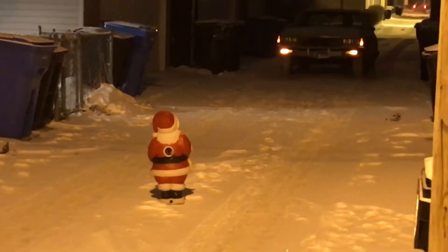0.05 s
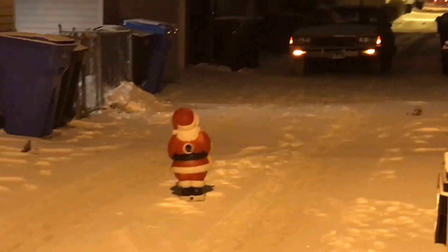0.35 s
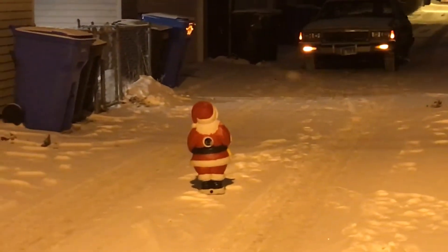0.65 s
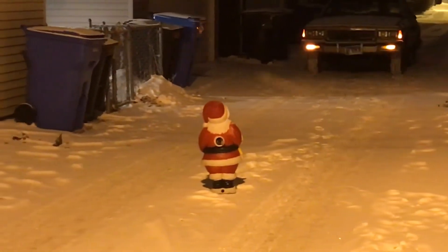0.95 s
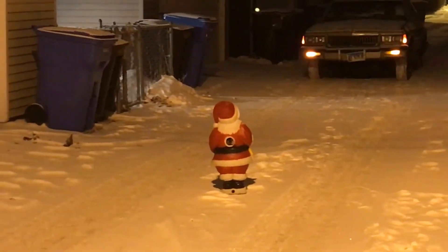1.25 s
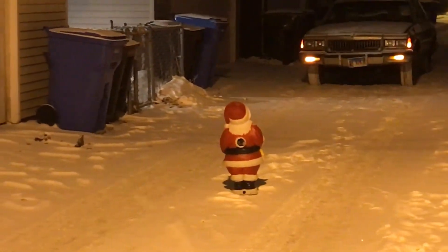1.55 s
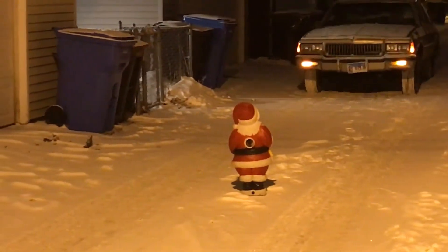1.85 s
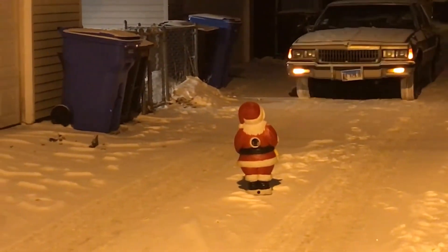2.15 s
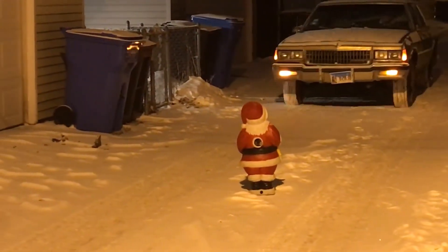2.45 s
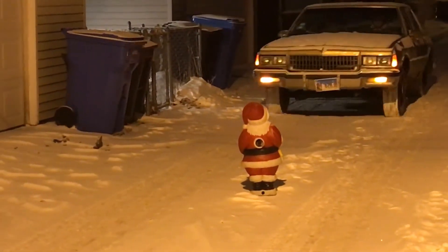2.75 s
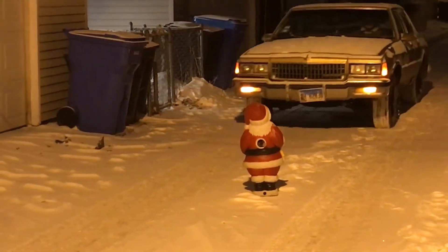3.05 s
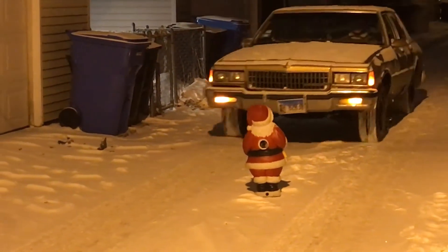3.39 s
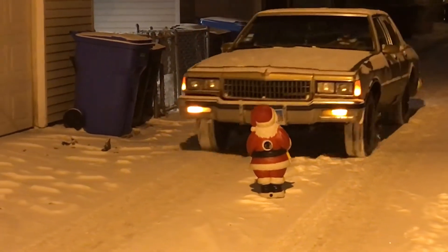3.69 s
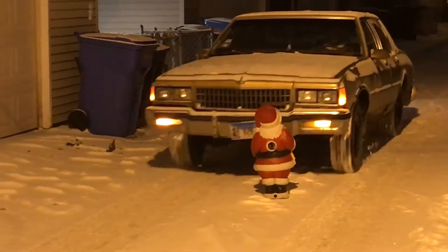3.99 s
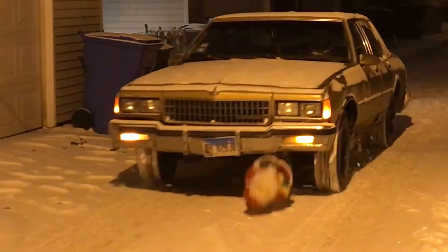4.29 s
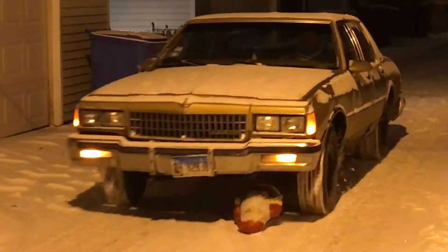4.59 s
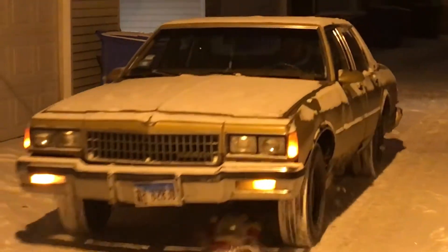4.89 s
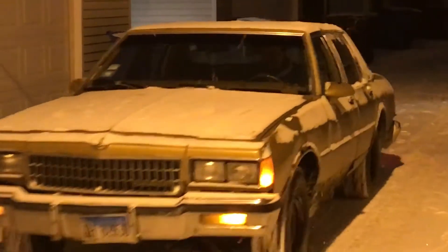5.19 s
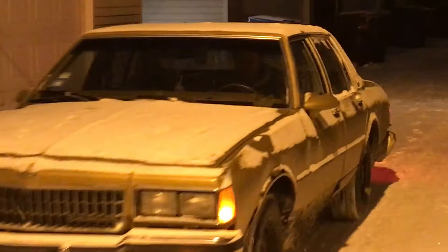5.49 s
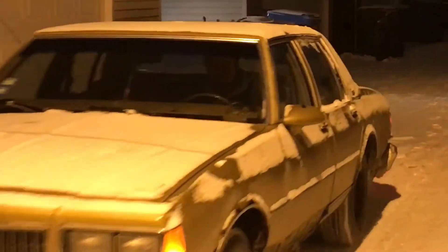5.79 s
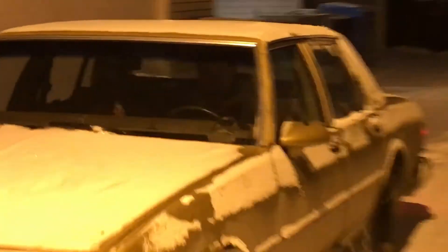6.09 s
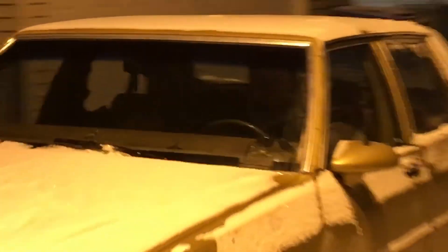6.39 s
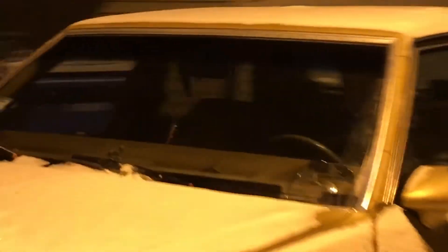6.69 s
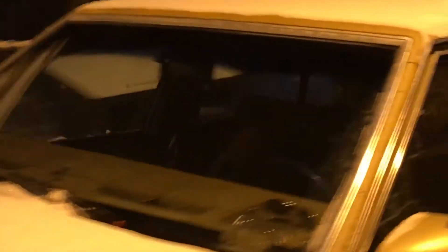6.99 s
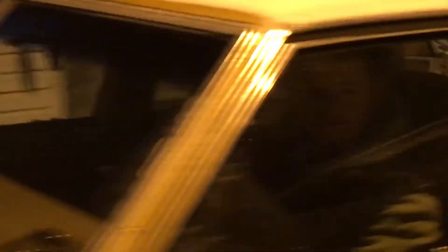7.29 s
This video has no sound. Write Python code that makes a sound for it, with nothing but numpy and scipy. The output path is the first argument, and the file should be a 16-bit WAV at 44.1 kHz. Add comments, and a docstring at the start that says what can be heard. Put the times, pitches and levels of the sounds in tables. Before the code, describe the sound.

A low, uneven engine rumble slowly draws nearer in an alley, with soft creaks of snow under the tyres. Suddenly a hollow plastic figure is run over with sharp cracks, hollow knocks and crunching, much louder than the car. Wedged underneath, it rubs and judders across the snow, cracks again and keeps up a hollow, booming scrape as the car comes close to the microphone.

```python
"""A car crushes a plastic figure

An old V8 sedan creeps up a snowy alley, engine throbbing and tyres crunching, and knocks over a
hollow plastic figure. The shell cracks, squeaks and crumples under the bumper, then is dragged
over packed snow, booming and scraping, as the car passes close by.
Garage walls echo the figure's noises, and a limiter holds down the loudest blows."""
import sys
import numpy as np
from scipy import signal
from scipy.fft import rfft, irfft, next_fast_len
from scipy.io import wavfile
from scipy.ndimage import uniform_filter1d, minimum_filter1d, map_coordinates

SR = 44100
rng = np.random.default_rng(int(sys.argv[2]) if len(sys.argv) > 2 else 0)


def wav_record(signal):
    """Record a signal, one row per channel, as 16-bit PCM in the file named by sys.argv[1]."""
    frames = np.transpose(np.atleast_2d(signal))
    bounded = np.clip(frames, -1, 1)
    # unit amplitude maps onto the largest positive 16-bit level
    quanta = np.round(bounded * 32767).astype(np.int16)
    wavfile.write(sys.argv[1], SR, quanta)


N = 328545
T = np.arange(N) / SR

# The shell cracks: t/s, level/dB, knock offset/dB, sizzle offset/dB
CRACKS = [(4.2286, -1.5, 4, -10), (4.256, 4, -8, -21), (4.275, -6, -4, -22), (4.3637, -15, 9, -23),
          (4.4428, 0, 3, -26), (4.5, -2, 1, -30), (4.664, -20, -11, -15), (4.7731, -10.5, 1, -17),
          (4.8926, -10, 5, -19), (4.915, -6.5, 2, -24), (4.997, -16, -10, -11), (5.026, -14.5, -6, -13),
          (5.1432, -20.5, 2, -4), (5.4288, -19, 3, -21), (5.789, -19.5, -21, -11), (6.3374, -13, -10, -1),
          (6.561, -0.5, 1.5, -30), (6.581, -9, 2, -31), (6.605, -17.5, 11.5, -31),
          (6.6694, -18.5, 8.5, -26)]
# The bumper buckles the shell: t/s, rise/s, hold/s, level/dB, wall offset/dB, snow offset/dB
SHOVES = [(4.233, .003, 0.043, -10.5, 2, -6), (4.36, 0.044, .045, -18.5, -1.5, -4),
          (4.445, 0.049, 0.065, -8, 0, -1), (4.673, 0.045, 0.029, -27, 3, -3),
          (4.774, 0.018, .025, -15.5, -1, -5), (4.837, 0.033, 0.025, -24, 0, -2),
          (4.898, 0.047, 0.03, -12, 1.5, 1.5), (5.022, 0.033, .025, -21, 0.5, -2),
          (5.158, 0.033, 0.027, -24, 1.5, 1), (5.227, .03, 0.056, -18, -1, 6.5),
          (5.432, 0.051, 0.093, -21.5, -0.5, 3), (5.631, 0.041, 0.068, -23, -16, -4)]
# The body hits car and ground: t/s, ring level/dB, thud level/dB, favoured f/Hz
BUMPS = [(4.231, -1, -16.5, 1120), (4.243, 1, -16.5, 230), (4.372, -10, -40, 1100), (4.445, -6, -13, 1005),
         (4.501, -10.5, -35.5, 900), (4.775, -15, -29, 300), (5.921, -17, -28, 630), (6.343, -10, -27, 280),
         (6.567, -7.5, -22, 450), (7.335, -11, -31, 300)]
# Notes of the struck body: f/Hz, level/dB, time to fade by 60 dB/s
BODY_NOTES = [(225, -8, 0.14), (233, -19, 0.13), (581, -27, 0.17), (803, -35, 0.056), (1055.6, -4, 0.18),
              (1090, -4, 0.13), (1166, 0.5, 0.084), (1544, -9, 0.14), (1850, -6.5, 0.24), (1930, -20, .08),
              (2230, -3, 0.13)]
# Short high squeals of the plastic; the last two are a crack ringing: t/s, length/s, f/Hz, level/dB
SQUEALS_AND_RINGS = [(4.249, .011, 4170, -10), (4.261, .025, 4110, -9), (4.289, .047, 4130, -21),
                     (4.305, .04, 4800, -28), (4.39, .022, 4090, -23), (4.655, .06, 3500, -35),
                     (4.775, .08, 3520, -29), (4.825, .025, 4120, -25), (4.865, .12, 3510, -26),
                     (4.955, .03, 5000, -30), (4.99, .08, 3500, -31), (6.561, .012, 3000, -16),
                     (6.562, .016, 3950, -18)]
# Events during the drag: t/s, rise/s, hold/s, level/dB
CATCHES = [(5.92, 0.0042, .006, -3.5), (6.1, .04, 0.029, -2.5), (6.356, .025, 0.071, 3),
           (6.533, .015, 0.0035, 3.5), (6.587, 0.039, .02, 3), (6.688, .02, .01, 2.5),
           (6.776, 0.034, 0.019, -3), (6.902, 0.096, 0.085, 0), (7.192, 0.028, 0.038, -2),
           (7.343, .05, 0.075, 4.5)]  # the shell snags on ridges, adding to the steady drag
CRUSTS = [(5.785, 0.022, 0.046, -37.5), (5.88, 0.038, 0.026, -36), (5.985, .03, .015, -38),
          (6.1, .04, 0.084, -36.5), (6.336, 0.0082, 0.0063, -34), (6.4, 0.039, .08, -39.5)]  # snow crusts burst under it
# The rubbing note, which climbs as the shell is pressed flatter: t/s, f/Hz, width/Hz, level/dB
RUB_NOTES = [(5.95, 564, 70, -1.5), (6.5, 576, 120, -9), (7.0, 670, 110, 0), (7.22, 802, 220, 2.5),
             (7.4, 636, 200, -0.5)]

# The car draws near: t/s, distance/m
APPROACH = [(0, 24), (1.7, 15.2), (4.15, 6.7), (7.45, 4.2)]
# Engine speed, in firings a second: t/s, f/Hz
FIRING_RATE = [(0, 42.8), (0.55, 41.5), (0.85, 44.4), (1.45, 41), (2.15, 43.5), (2.68, 36.4), (3.0, 39.5),
               (3.85, 41), (4.2, 37.4)]
# Relative strength of each of the eight firings
CYLINDERS = [0.7, 0.57, 1.23, 1.3, 1.2, 1, 0.57, 0.95]
# The tailpipe, loudest as the car draws level: t/s, level/dB
EXHAUST_LEVEL = [(0, -35), (1.0, -33.5), (1.25, -35), (4.2, -34.5), (6.2, -31.5), (7.2, -26)]
# The three tones of the exhaust drone
DRONE_MULTIPLES = [2, 3, 3.75]  # multiples of the firing rate
DRONE_LEVELS = [-4, -3, -13.5]  # relative level/dB at idle
# The highest tone booms out: t/s, length/s, boost/dB
DRONE_SWELLS = [(1.499, 0.2, 16), (1.924, 0.22, 16.5)]
# Events under the tyres: t/s, length/s, level/dB
SNOW_CREAKS = [(1.88, 0.12, -47), (2.08, 0.22, -43.5), (2.549, 0.22, -43), (2.864, 0.11, -38),
               (3.2, 0.11, -50), (3.641, 0.11, -43)]
ICE_CRACKLES = [(.64, .09, -60)]

# Resonances, the pitches at which a thing likes to ring: f/Hz, width/Hz, level/dB
SHELL_MODES = [(222, 66, 11), (535, 117, 4.5), (1120, 59, -26), (1800, 330, -5.5)]  # the whole hollow shell
WALL_MODES = [(3520, 76, 5.5), (4110, 76, 2), (4590, 150, -3.5), (4910, 58, -3), (6020, 170, -7.5),
              (8200, 380, -15.5), (9430, 200, -13.5)]  # its thin wall
BAY_MODES = [(580, 56, -4), (677, 51, 2), (1100, 600, -4)]  # the engine bay
TREAD_MODES = [(555, 110, 5), (647, 38, -1), (1100, 180, -14)]  # snow under the tread

# Tone colours, from bass to treble: f/Hz, relative level/dB
FLEX_TONE = [(65, -41), (110, -22.5), (220, -2.5), (342, -1.5), (377, -13.5), (433, 1), (483, -7.5),
             (540, -2.5), (763, -11.5), (1020, -2.5), (1570, -6), (1660, -5), (1870, -5), (3000, -25.5),
             (3900, -40), (6600, -120)]  # bending plastic
CRACKLE_TONE = [(1290, -8), (2200, -1), (3180, -7), (3510, -2), (3800, -1), (4110, 1), (5500, -9),
                (6070, -4.5), (7350, -16), (8360, -19.5), (12000, -21), (15600, -63), (22000, -120)]  # breaking plastic
BOOM_TONE = [(35, -38), (60, -20), (86, -5), (238, -1), (284, 2), (360, -10.5), (420, -9.5), (550, -33),
             (920, -120)]  # lows of the drag
RUB_TONE = [(190, -36), (330, -6), (439, -3.5), (564, 1.5), (693, -2), (883, -4.5), (1420, -6.5),
            (2240, -21.5), (2800, -30), (3640, -44), (6160, -120)]  # its middle
SCRATCH_TONE = [(1290, -21), (2200, 2), (2900, 1), (3140, 0.5), (3930, -0.5), (4940, -5), (6680, -6.5),
                (7540, -13), (9680, -19.5), (11000, -48), (14300, -33), (22000, -120)]  # its highs
POWDER_TONE = [(3000, -56), (6500, -1.5), (9200, 1.5), (10400, -3), (12000, 0.5), (15800, -2.5)]  # spraying snow
PIPE_TONE = [(15, -62), (25, -47), (40, -8), (75, 1), (102, -1), (129, -6), (150, -3.5), (166, -3.5),
             (200, -4.5), (242, -7.5), (271, -12.5), (299, -11), (384, -20), (500, -23.5), (650, -44),
             (1100, -120)]  # tailpipe
BAY_TONE = [(130, -24), (220, -1), (244, -0.5), (271, -9), (304, -6.5), (388, -9), (568, -3), (777, -8.5),
            (1100, -5.5), (1340, -12.5), (1710, -13.5), (2010, -18), (3500, -35.5), (4550, -57),
            (7700, -120)]  # fan and belts
HISS_TONE = [(1470, -25), (2500, -2.5), (2790, -5.5), (3250, -5), (4100, -4), (5010, -12.5), (5840, -9.5),
             (7530, -15.5), (8790, -14.5), (10700, -22), (12600, -20), (14500, -25), (15800, -35)]  # faint steady hiss of tyres and distant air
CRUNCH_TONE = [(900, -26), (1600, 1), (2300, -3), (3100, -5.5), (3800, -20), (7000, -34)]  # pressed snow

# The alley's echo: f/Hz, time to fade by 60 dB/s
ECHO_DECAY = [(100, 0.61), (1000, 0.68), (4000, 0.37), (14000, 0.12)]

IMPACT_S, DRAG_S, JAM_S = 4.231, 5.7, 6.335  # the figure is hit, starts to drag, jams under the car


def cracks():
    """Each crack is a sharp snap, a quickly dying run of smaller ones and a knock of the hollow body."""
    knock, snap, sizzle = np.zeros((3, N))
    for s, db, knock_db, sizzle_db in CRACKS:
        start = max(s, IMPACT_S)
        age = np.maximum(T - start, 0)
        onset = amp(db) * fade_in(start, 0.00066)
        burst = onset * decay(age, 0.055)
        snap += burst + .5 * onset * decay(age, 0.0058)
        knock += burst * amp(knock_db)
        sizzle += burst * amp(sizzle_db)
    ticks = grains(rate=3000, spread_db=2.5, bed=.6)
    layers = [(knock, FLEX_TONE, -6), (snap, CRACKLE_TONE, -10), (sizzle, POWDER_TONE, -4)]
    return sum(amp(db) * colour(ticks * force, tone) / np.std(colour(ticks, tone))
               for force, tone, db in layers)


def shoving():
    """How hard the bumper's shoves press on the body, its thin wall and the snow, as three gains."""
    body = wall = ground = amp(-27.5) ** 2  # steady sliding between shoves
    for s, rise, hold, db, wall_db, snow_db in SHOVES:
        power = push(s, rise, hold, db)
        body = body + power
        wall = wall + power * amp(wall_db) ** 2
        ground = ground + power * amp(snow_db) ** 2
    return np.sqrt([body, wall, ground])


def push(start, rise, hold, db, release_db_per_s=209):
    """Power of one push: it builds to full force at start, holds, then relaxes."""
    building = np.clip((T - start) / max(rise, .002) + 1, 0, 1)
    relaxing_s = np.clip(T - start - hold, 0, 1)
    return (building * amp(db - release_db_per_s * relaxing_s)) ** 2


def crumpling(body_force, wall_force):
    """Plastic buckles: coarse folds ring the hollow body, fine fractures ring its thin wall."""
    folds = grains(rate=1500, spread_db=1.5, bed=0.81)
    fractures = unit(.5 * folds + grains(rate=1100, spread_db=3.5, bed=0.6))
    body = unit(colour(folds, FLEX_TONE)) + .5 * unit(resonate(folds, SHELL_MODES))
    body = bending(body, depth_db=2.5)
    ring = unit(resonate(grains(rate=1400, spread_db=1.5, bed=0.31), WALL_MODES))
    wall = bending(unit(colour(fractures, CRACKLE_TONE)) + 1.14 * ring, depth_db=2.0)
    sound = body_force * body + amp(-8) * wall_force * wall
    return sound * fade_in(IMPACT_S, 0.0015) * (1 - fade_in(DRAG_S, .05))


def bending(x, depth_db):
    """The bending shell keeps shifting which pitches it favours."""
    spectra = signal.stft(x, nperseg=1024)[2]
    patches = uniform_filter1d(rng.standard_normal(spectra.shape), size=3, axis=0)  # smooth over pitch
    patches = unit(uniform_filter1d(patches, size=6, axis=1))  # and over time
    return unit(signal.istft(spectra * amp(depth_db * patches), nperseg=1024)[1][:N])


def bumps():
    """Each blow rings the body's notes, most those near its favoured pitch, over a dull push of air."""
    sound, t = np.zeros(N + SR), np.arange(SR // 2) / SR
    hz, level_db, fade_s = np.transpose(BODY_NOTES)[:, :, None]
    thud = np.sin(2 * np.pi * 105 * t) * decay(t, .08)
    attack = 1 - np.exp(-t / 0.0011)
    for s, db, thud_db, favoured_hz in BUMPS:
        strength, detune = rng.standard_normal((2, len(BODY_NOTES), 1))
        note_db = level_db + 2 * strength - 6 * np.abs(np.log2(hz / favoured_hz))
        notes = np.sin(2 * np.pi * hz * (1 + 0.011 * detune) * t)
        ring = np.sum(amp(note_db) * decay(t, fade_s) * notes, axis=0)
        sound[round(s * SR):][:len(t)] += amp(db) * ring * attack + amp(thud_db) * thud
    return sound[:N]


def squeals_and_rings():
    """Rough, wavering tones: short high squeals of the plastic, and the brief ring of a sharp crack."""
    sound, waver = np.zeros(N), wobble(600)
    for s, length, hz, db in SQUEALS_AND_RINGS:
        phase = 2 * np.pi * np.cumsum(hz * (1 + 0.01417 * waver)) / SR
        sound += amp(db) * swell(s, length) * (np.sin(phase) + 0.13 * np.sin(2 * phase))
    return sound * amp(4.9 * wobble(280))


def dragging():
    """Wedged under the car, the shell judders over ridges of packed snow; once jammed, it booms."""
    judder = amp(1.76 * wobble(45))
    slips = grains(rate=1200, spread_db=2.5, bed=0.66) * judder
    hollow = unit(resonate(resonate(slips, [(282, 59, 0)]), [(283, 69, 0)]))
    rumble = unit(colour(rng.standard_normal(N), BOOM_TONE))
    boom = 0.88 * rumble + 0.89 * hollow * fade_in(JAM_S, 0.14)
    rub = bending(rubbing(slips), depth_db=1.7)
    grit = grains(rate=1700, spread_db=2.0, bed=1.0) * judder
    scratch = unit(colour(grit, SCRATCH_TONE)) + .5 * unit(resonate(slips, WALL_MODES))
    scratch = bending(scratch, depth_db=2.0)
    catch_db = 10 * np.log10(1 + sum(push(*row) for row in CATCHES))
    jammed = fade_in(JAM_S, 0.011)
    boom *= amp(-32 + 7.5 * jammed + catch_db)
    rub *= amp(-23 + 2.5 * jammed + catch_db)
    scratch *= amp(-34.5 + 2 * jammed + 0.54 * catch_db + shade_db())
    return (boom + rub + scratch) * np.sqrt(fade_in(DRAG_S, 0.17))


def rubbing(slips):
    """The sliding shell makes a broad noise with one hollow note that fades from pitch to pitch."""
    times = [row[0] for row in RUB_NOTES]
    sound = unit(colour(slips, RUB_TONE))
    for share, (_, hz, width, db) in zip(np.eye(len(times)), RUB_NOTES):
        note = unit(resonate(grains(rate=900, spread_db=3.5, bed=1.0), [(hz, width, 0)]))
        sound += np.interp(T, times, share) * amp(db) * muffle(note, above_hz=1800)
    return sound


def snow_spray(ground_force):
    """Dry crystals crunch and hiss under the sliding plastic."""
    wedged = fade_in(DRAG_S, 0.052)
    thrown = amp(-19.5) * ground_force
    dragged = np.sqrt(amp(-40 + shade_db()) ** 2 + sum(push(*row) for row in CRUSTS))
    gain = ((1 - wedged) * thrown + wedged * dragged) * amp(2.2 * wobble(45))
    powder = unit(colour(grains(rate=2500, spread_db=-0.5, bed=0.92), POWDER_TONE))
    return gain * powder * fade_in(IMPACT_S, 0.0019)


def shade_db(db_per_s=2.5):
    """After the jam, the passing car hides more and more of the high scratch and spray."""
    return -db_per_s * np.maximum(T - JAM_S, 0)


def exhaust(idle_hz=42.5, drone_db_per_hz=1.7):
    """Uneven firings thump through the tailpipe, with a wavering drone that grows with engine speed."""
    firing_hz = curve(FIRING_RATE)
    firings = np.cumsum(firing_hz * (1 + .012 * wobble(9))) / SR  # running count
    fired = np.flatnonzero(np.diff(np.floor(firings)))
    pulses = np.zeros(N)
    pulses[fired] = np.resize(CYLINDERS, len(fired)) * amp(2.0 * rng.standard_normal(N)[fired])
    # the alley smears most of each puff into a rumble
    rumble = (1 + 0.22 * np.cos(2 * np.pi * firings)) * rng.standard_normal(N)
    burble = unit(colour(0.33 * unit(pulses) + rumble, PIPE_TONE))
    low, middle, high = (
        amp(db + 2.5 * wobble(10)) * np.sin(2 * np.pi * multiple * firings + .45 * wobble(8))
        for multiple, db in zip(DRONE_MULTIPLES, DRONE_LEVELS))
    booming = amp(sum(db * swell(s, length) for s, length, db in DRONE_SWELLS))
    drone = amp(drone_db_per_hz * (firing_hz - idle_hz)) * (low + middle + booming * high)
    return amp(curve(EXHAUST_LEVEL)) * unit(burble + drone)


def engine_bay():
    """Fan and belts rush, growing louder as the car pulls away and comes nearer."""
    pull_away_db = 2.5 * fade_in(0.4, 0.13)
    rush = unit(colour(rng.standard_normal(N), BAY_TONE))
    ring = unit(resonate(rush, BAY_MODES))
    return amp(-22 + pull_away_db + nearness_db() + 0.7 * wobble(12)) * unit(rush + 0.28 * ring)


def tyres():
    """Pressed snow crunches and creaks and ice crackles, over a faint hiss of tyres and distant air."""
    hiss = amp(-51 + 0.24 * nearness_db() + 0.87 * wobble(4.8))
    hiss *= unit(colour(grains(rate=1500, spread_db=5.5, bed=3.2), HISS_TONE))
    firm_snow = fade_in(1.4, 1.3)
    crunch = firm_snow * amp(-34.5 + nearness_db() + .8 * wobble(8))
    crunch *= unit(colour(grains(rate=900, spread_db=1.5, bed=1.5), CRUNCH_TONE))
    tread = resonate(grains(rate=600, spread_db=-1.0, bed=0.98), TREAD_MODES)
    creak = swells(SNOW_CREAKS) * unit(muffle(tread, above_hz=2600))
    ice = swells(ICE_CRACKLES) * unit(colour(grains(rate=300, spread_db=2, bed=0.36), HISS_TONE))
    return hiss + crunch + creak + ice


def nearness_db():
    """Level of the car compared with hearing it from 1 m."""
    return -20 * np.log10(np.maximum(curve(APPROACH), 1))


def alley_echo(x):
    """Garage walls answer after a short gap, treble dying first; echoes change as the figure moves."""
    hz, t, spectra = signal.stft(rng.standard_normal((8, SR // 2)), SR, nperseg=256)
    tails = signal.istft(spectra * decay(t, at_pitch(ECHO_DECAY, hz)[:, None]), SR, nperseg=256)[1]
    place = (T * 4).astype(int) % len(tails)  # the next echo tail every quarter second
    echo = sum(signal.fftconvolve(x * (place == k), tail / np.linalg.norm(tail))
               for k, tail in enumerate(tails))
    return np.pad(echo, (SR // 80, 0))[:N]


def grains(rate, spread_db, bed):
    """Tiny fractures of uneven size, about rate a second, on a bed of friction noise."""
    sizes = amp(spread_db * np.minimum(rng.exponential(size=N), 4))
    ticks = (rng.random(N) < rate / SR) * sizes * rng.choice([-1, 1], N)
    return unit(unit(ticks) + bed * rng.standard_normal(N))


def colour(x, tone):
    """Give x a tone colour, with no ringing ahead of a hit (a minimum-phase filter)."""
    def response(hz):
        cepstrum = irfft(np.log(amp(at_pitch(tone, hz)) + 1e-6))
        cepstrum[1:len(hz) - 1] *= 2
        cepstrum[len(hz):] = 0
        return np.exp(rfft(cepstrum))
    return filtered(x, response)


def resonate(x, modes):
    """Let x ring a set of resonances."""
    return filtered(x, lambda f: sum(amp(db) * 1j * f * width / (hz * hz - f * f + 1j * f * width)
                                     for hz, width, db in modes))


def muffle(x, above_hz):
    """Soften the treble."""
    return filtered(x, lambda hz: 1 / (1 + (hz / above_hz) ** 4))


def filtered(x, response):
    """Multiply each frequency in x by response(hz)."""
    size = 2 * next_fast_len(N // 2 + SR // 4)
    return irfft(rfft(x, size) * response(np.fft.rfftfreq(size, 1 / SR)), size)[:N]


def at_pitch(points, hz):
    """Read between (frequency, value) points on a pitch scale."""
    f, values = np.transpose(points)
    return np.interp(np.log(hz + 1), np.log(f + 1), values)


def curve(points):
    """Join (time, value) points with straight lines."""
    return np.interp(T, *np.transpose(points))


def wobble(rate):
    """A smooth curve through rate random values a second."""
    return map_coordinates(rng.standard_normal(int(N * rate / SR) + 4), [T * rate])


def swell(start, length):
    """A rounded rise and fall of height 1."""
    return np.sqrt(np.abs(np.sin(np.pi * np.clip((T - start) / length, 0, 1))))


def swells(events):
    """One swell for each event, at its own level."""
    return sum(amp(db) * swell(s, length) for s, length, db in events)


def fade_in(start, rise):
    """Go from 0 to 1 in rise seconds."""
    return np.clip((T - start) / rise, 0, 1)


def decay(age, fade_s):
    """Die away by 60 dB every fade_s seconds."""
    return amp(-60 * age / fade_s)


def amp(db):
    """Turn decibels into a gain."""
    return 10 ** (np.asarray(db) / 20)


def unit(x):
    """Scale to an average strength (rms) of 1."""
    return x / np.sqrt(np.mean(x ** 2) + 1e-20)


def scene():
    """The figure, its echo and the car, in one channel."""
    body_force, wall_force, ground_force = shoving()
    figure = crumpling(body_force, wall_force) + dragging() + snow_spray(ground_force)
    figure += cracks() + bumps() + squeals_and_rings()
    car = exhaust() + engine_bay() + tyres()
    return (figure + amp(-15.5) * alley_echo(figure) + car)[None]


def record(dry):
    """A fast limiter turns down the loudest peaks, then the very highest treble is cut."""
    ceiling, top_hz = .97, 15850
    needed = ceiling / np.maximum(np.abs(dry[0]), ceiling)
    gain = uniform_filter1d(minimum_filter1d(needed, size=160), size=160)
    return filtered(dry[0] * gain, lambda hz: hz < top_hz)[None]


dry = scene()
out = record(dry)
wav_record(out)
```